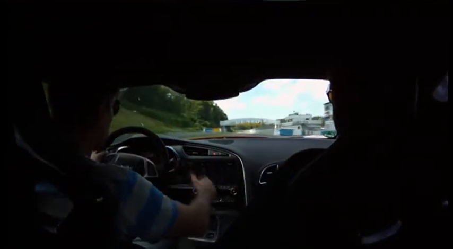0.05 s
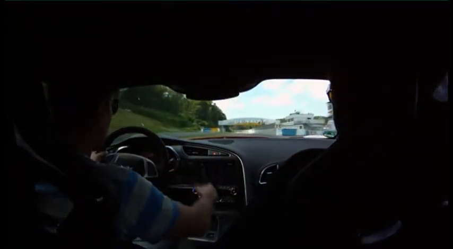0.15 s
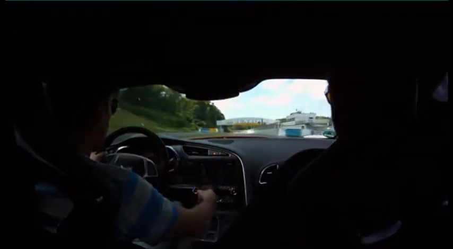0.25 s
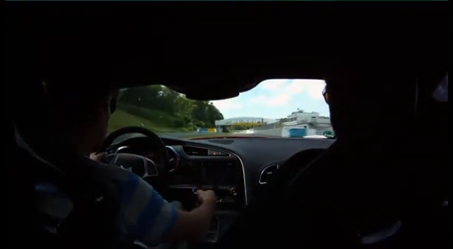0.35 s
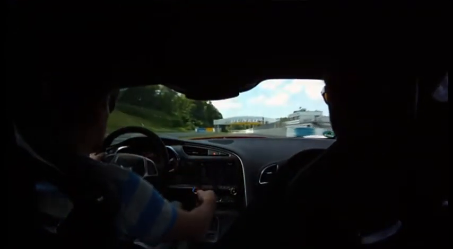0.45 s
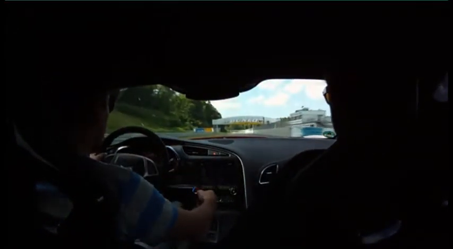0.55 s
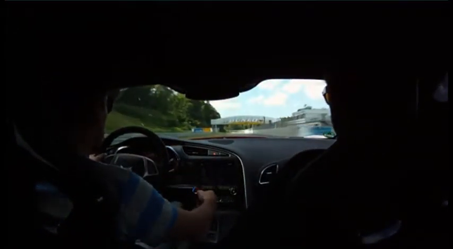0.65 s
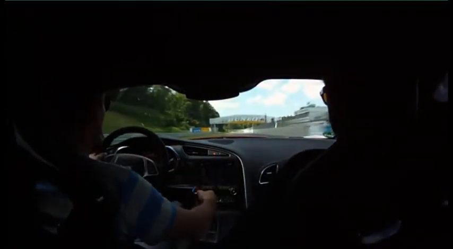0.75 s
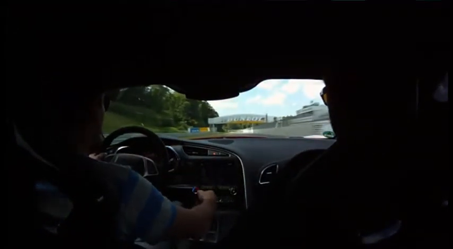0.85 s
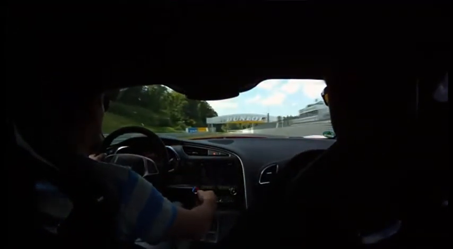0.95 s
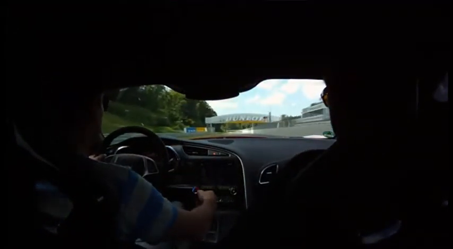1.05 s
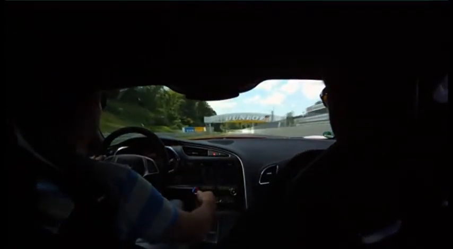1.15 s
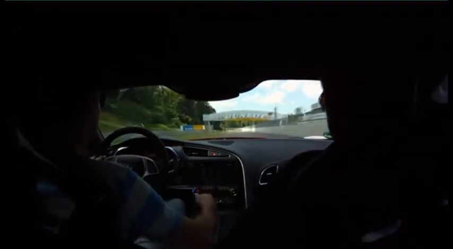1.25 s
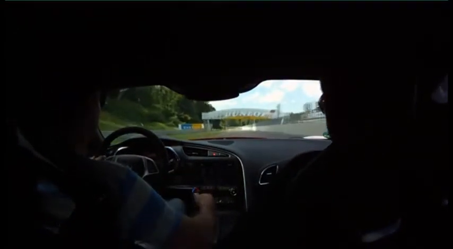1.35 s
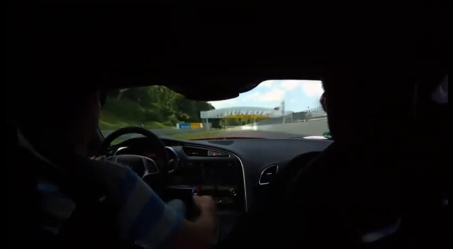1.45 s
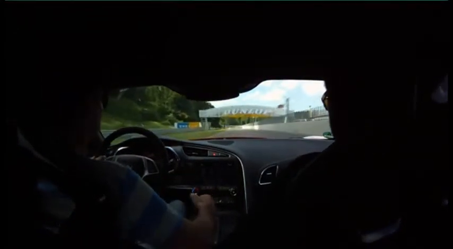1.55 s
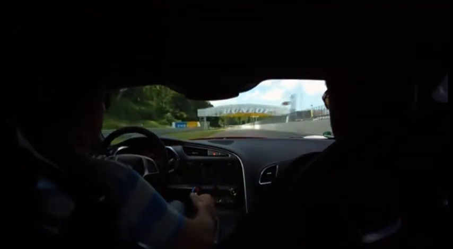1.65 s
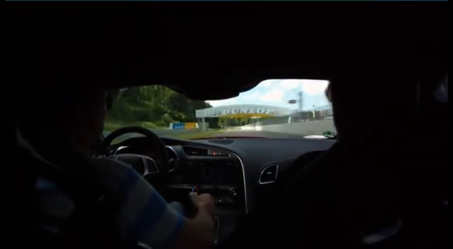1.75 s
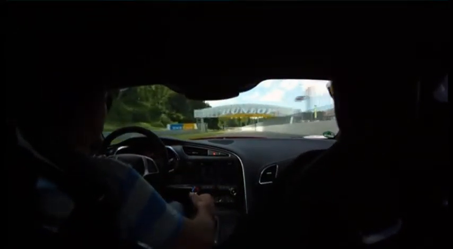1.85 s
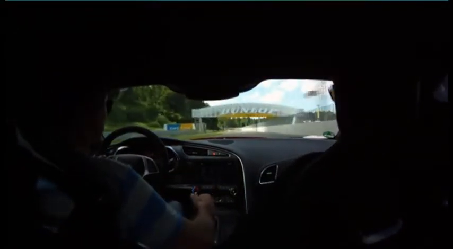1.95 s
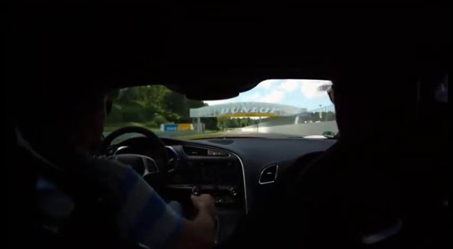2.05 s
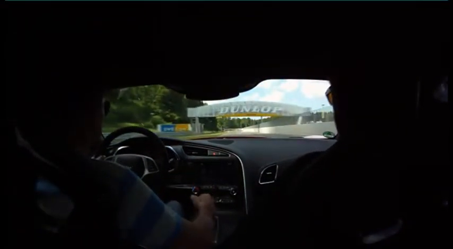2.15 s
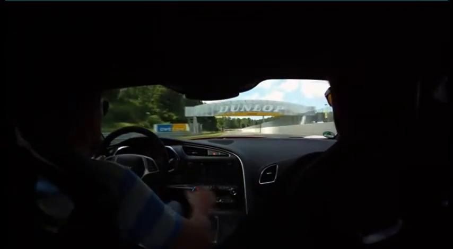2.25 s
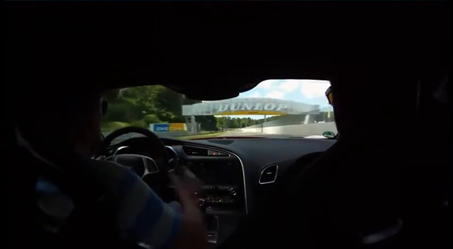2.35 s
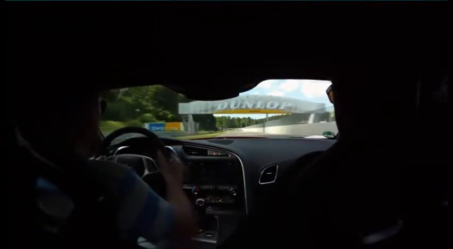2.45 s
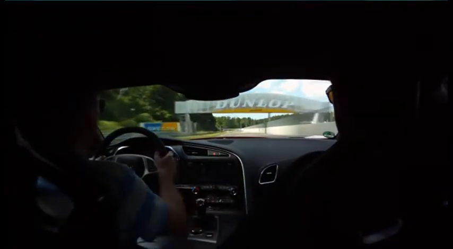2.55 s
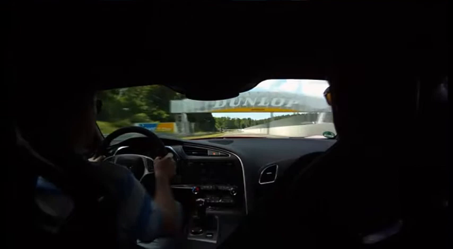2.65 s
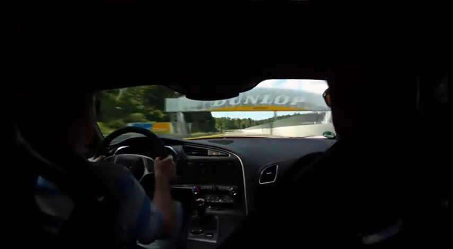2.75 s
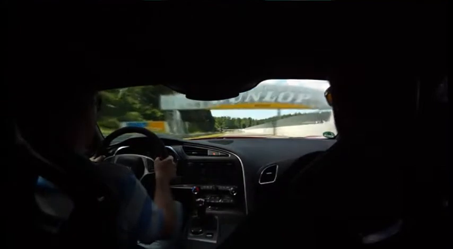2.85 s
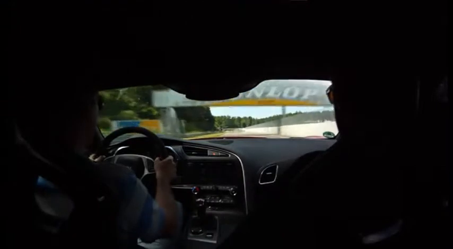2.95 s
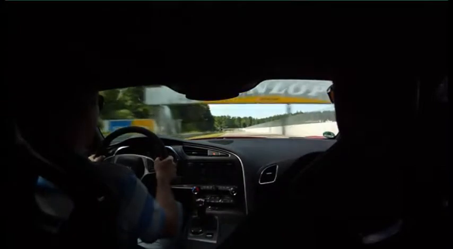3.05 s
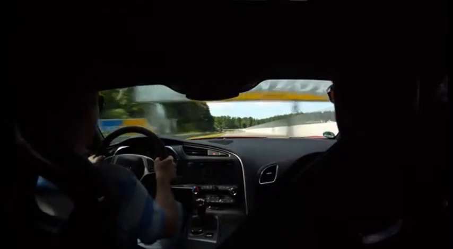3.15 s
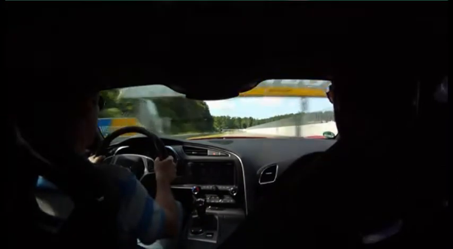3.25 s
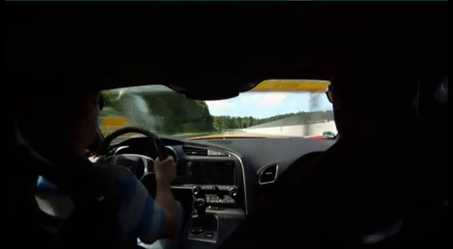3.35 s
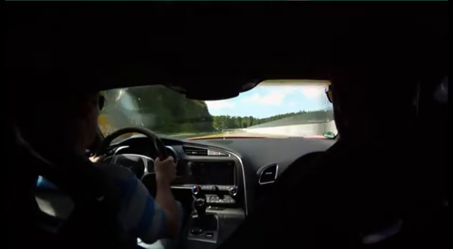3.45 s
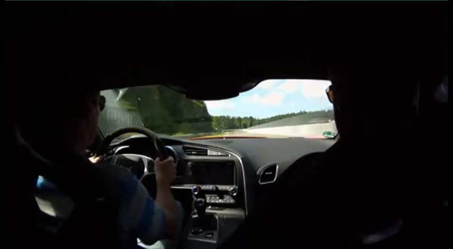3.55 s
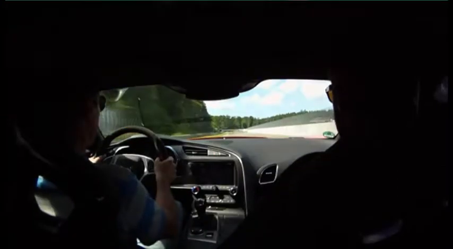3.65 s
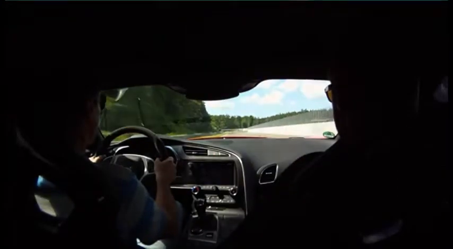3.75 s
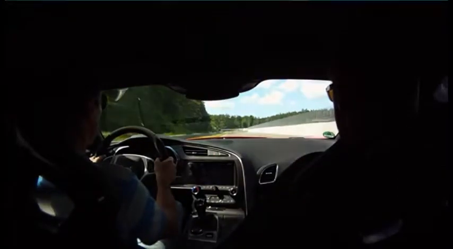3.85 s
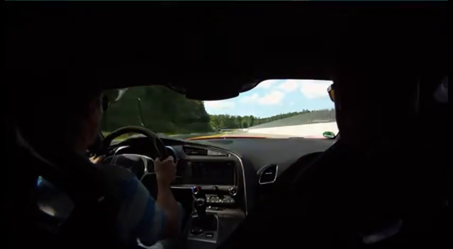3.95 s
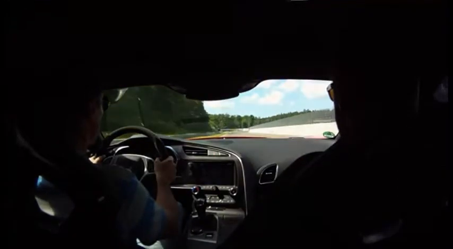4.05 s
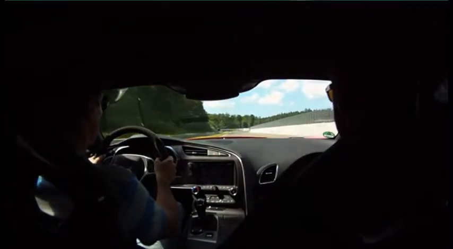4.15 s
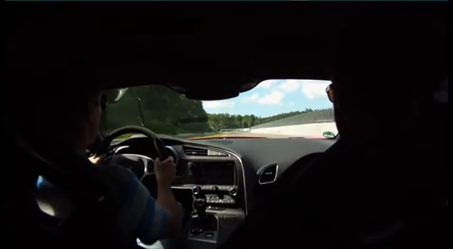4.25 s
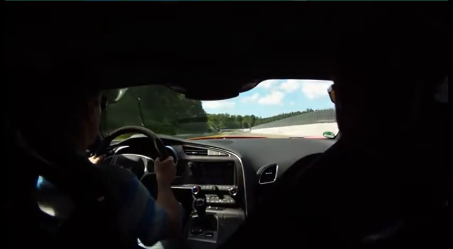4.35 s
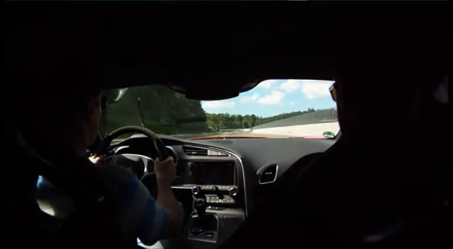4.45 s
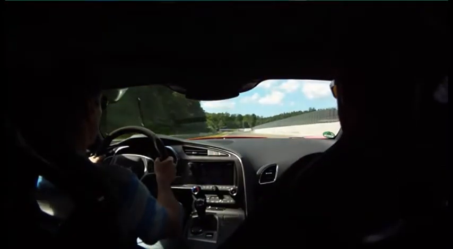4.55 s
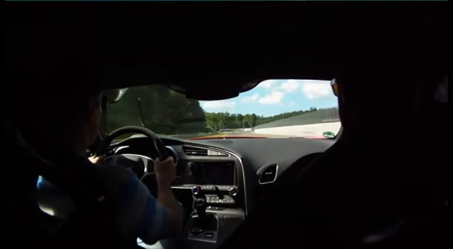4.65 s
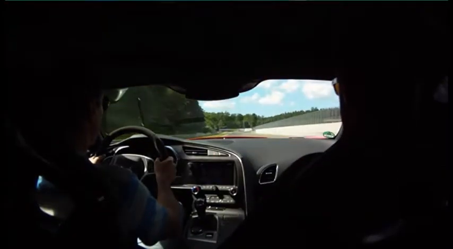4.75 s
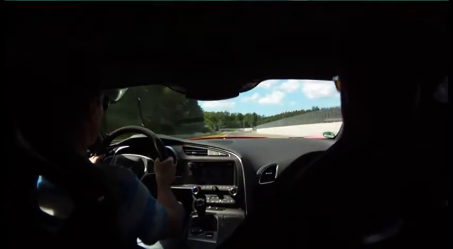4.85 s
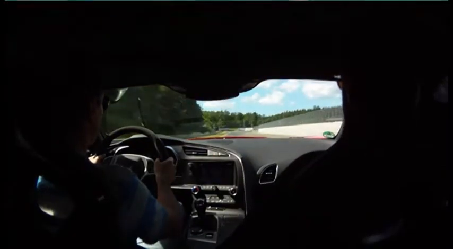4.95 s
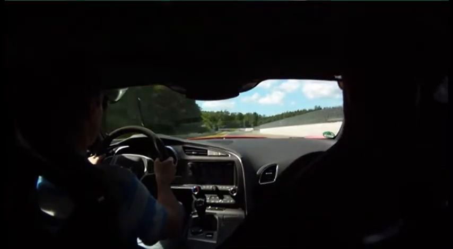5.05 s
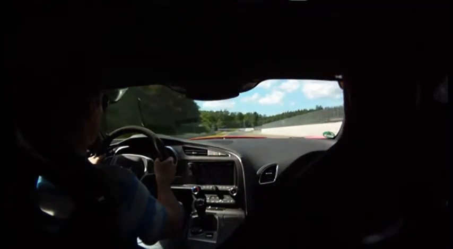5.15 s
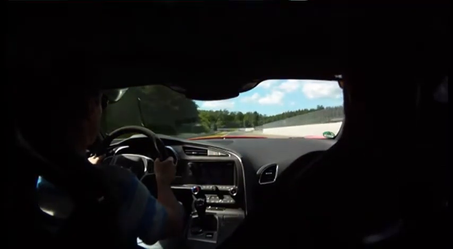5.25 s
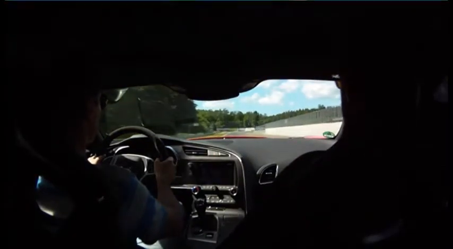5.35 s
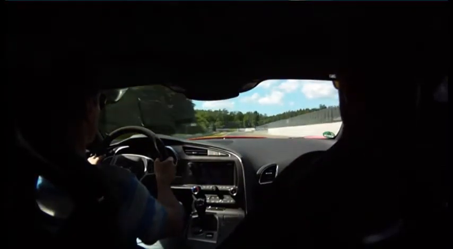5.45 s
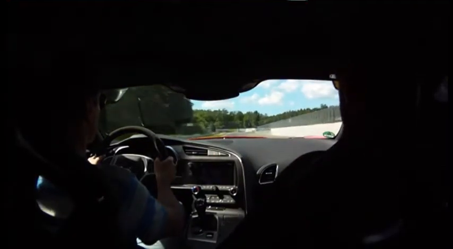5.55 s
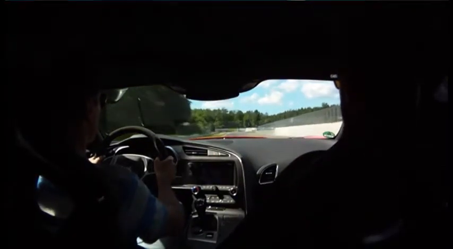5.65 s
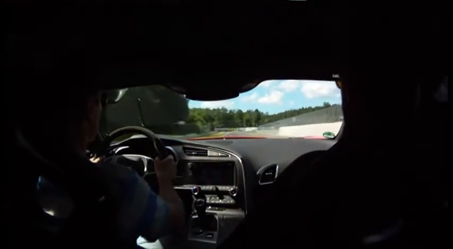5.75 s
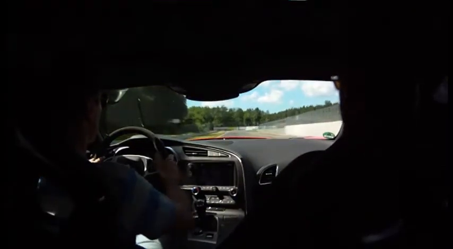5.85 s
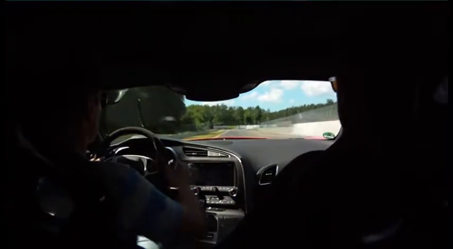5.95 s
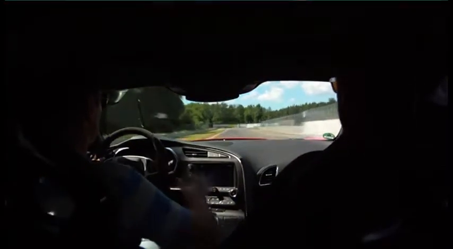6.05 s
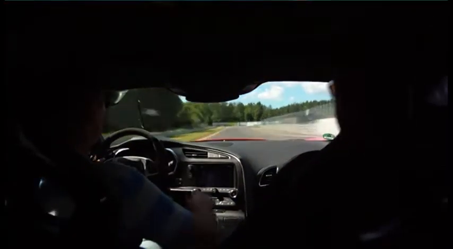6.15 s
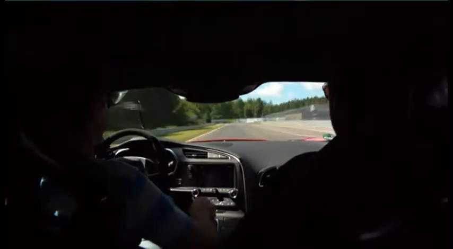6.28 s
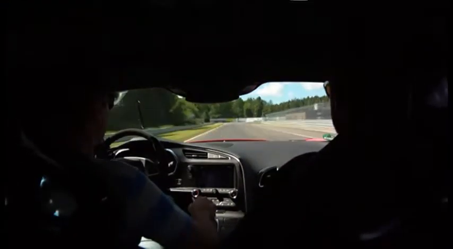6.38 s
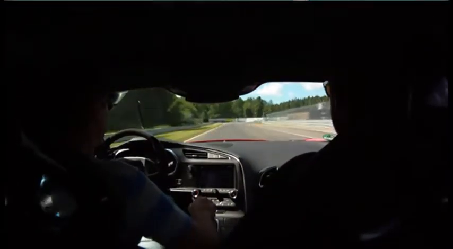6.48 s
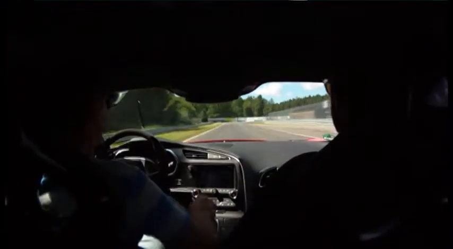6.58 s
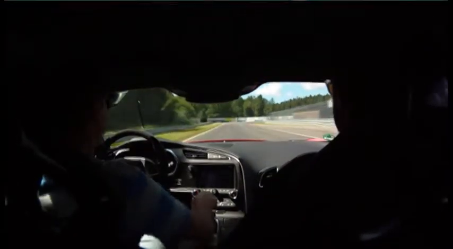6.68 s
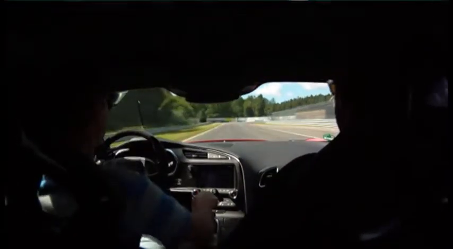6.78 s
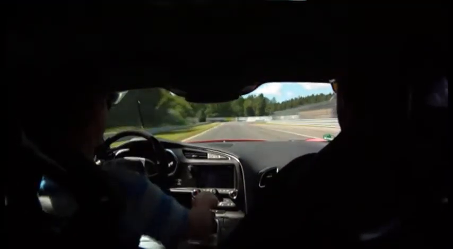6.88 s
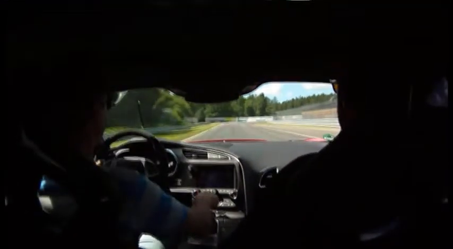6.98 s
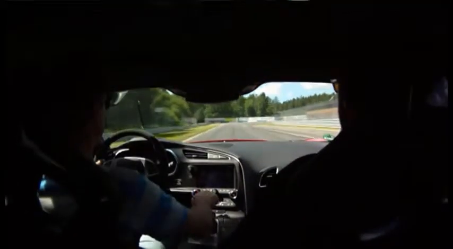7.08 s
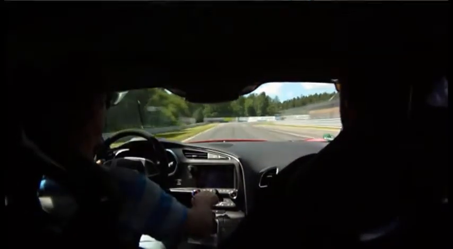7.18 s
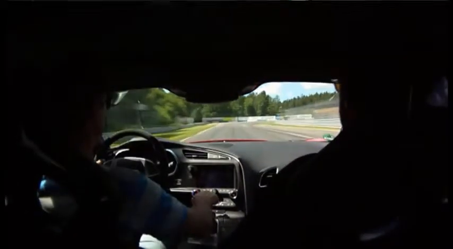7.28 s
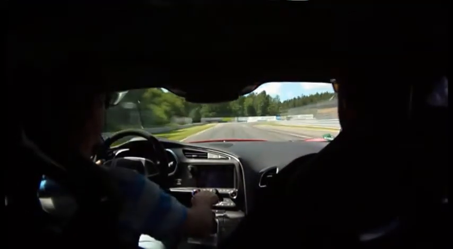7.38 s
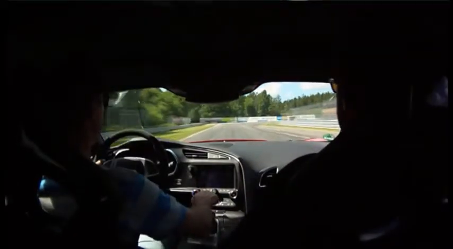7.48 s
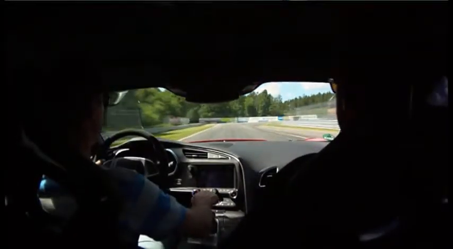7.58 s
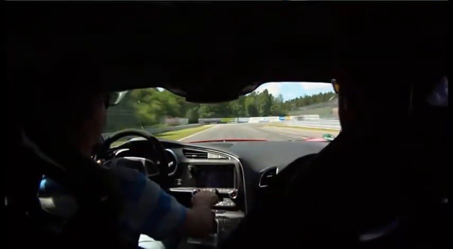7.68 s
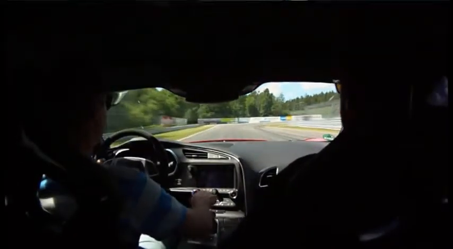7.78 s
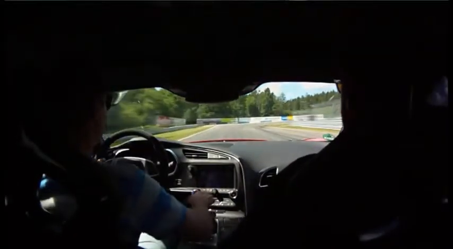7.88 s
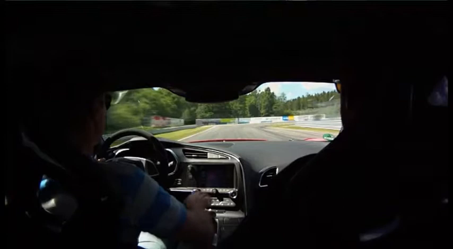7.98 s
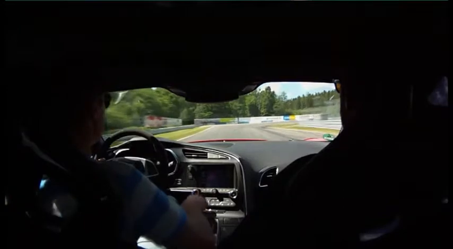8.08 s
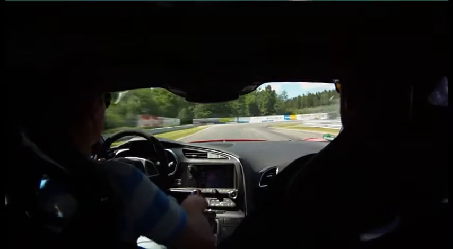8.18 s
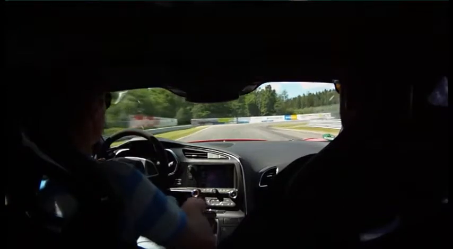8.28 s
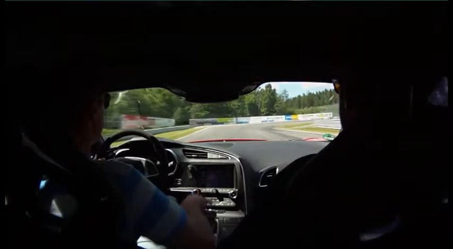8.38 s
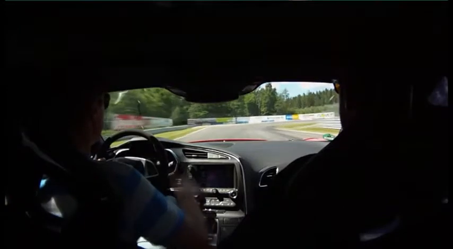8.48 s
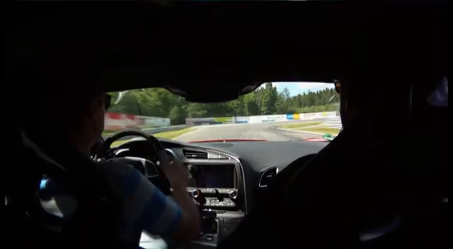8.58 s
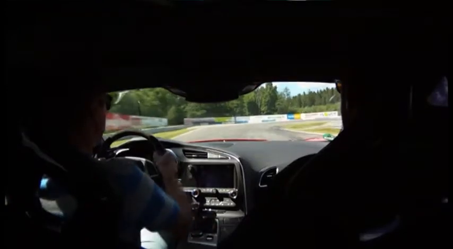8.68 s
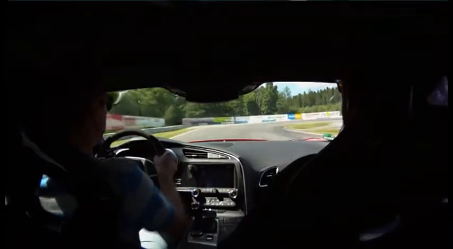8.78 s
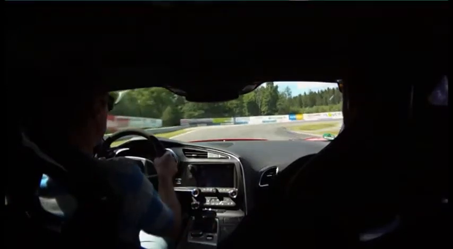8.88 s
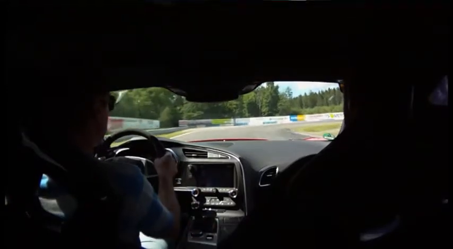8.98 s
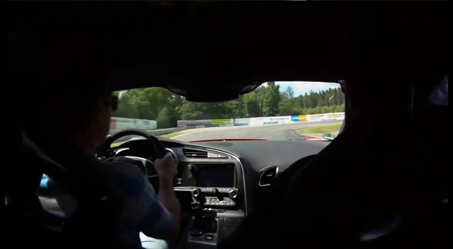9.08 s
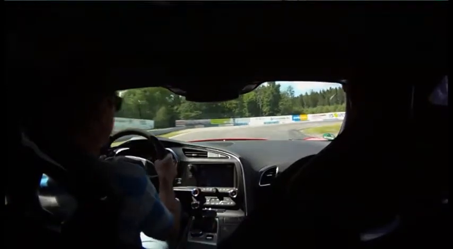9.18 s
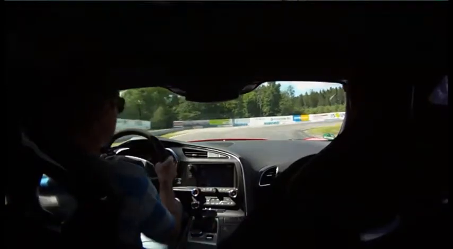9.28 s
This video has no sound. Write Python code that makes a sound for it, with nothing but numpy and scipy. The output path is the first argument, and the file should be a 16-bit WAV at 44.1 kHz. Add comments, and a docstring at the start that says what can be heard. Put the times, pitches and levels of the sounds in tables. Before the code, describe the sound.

Inside a sports car cabin, a V8 roars at full throttle, upshifts, pulls long, then brakes with two throttle blips, the microphone crackling from overload.

```python
"""A V8 at full throttle inside a sports car: an upshift, a long pull, then braking with two throttle blips.
Firing tone, octave and uneven half orders boom in the cabin; intake hiss comes in quick random puffs.
Thumps, ticks, a body drone and road rumble lie beneath. Body heave and engine shoves overload the
microphone capsules; the high-set, gently sloping wind filter behind them turns each clipped crest
into a crackle."""
import sys
import numpy as np
from scipy import signal
from scipy.fft import rfft, irfft, next_fast_len
from scipy.io import wavfile
from scipy.ndimage import uniform_filter1d

SR = 44100
rng = np.random.default_rng(int(sys.argv[2]) if len(sys.argv) > 2 else 0)


def transcribe(u):
    """Save the signal u as a 16-bit wav file named by the first command-line argument.

    u: samples, shape (n,) or (channels, n), limited to [-1, 1]; the rate is SR.
    q: integer samples, one column per channel.
    """
    v = np.clip(np.atleast_2d(u).T, -1, 1)
    q = np.round(v * 32767).astype(np.int16)
    wavfile.write(sys.argv[1], SR, q)


N = 410991

BOOM_HZ, WIND_CUT_HZ = 45.5, 2214
HARD_BEAT_S = 2.5058  # a moment when the hardest beat of the cycle falls


def undb(db):
    """Amplitude of a level in dB."""
    return 10 ** (np.asarray(db) / 20)


def unit(x):
    """Scales to an RMS of 1."""
    return x / np.sqrt(np.mean(x ** 2))


def lookup(table, at):
    """Columns joined by straight lines, read along a control; a first column that falls back is held."""
    x, *columns = np.transpose(table)
    return [np.interp(at, np.maximum.accumulate(x), c) for c in columns]


def curves(table):
    """Columns of a table in time."""
    return lookup(table, np.arange(N) / SR)


def band(x, hz, width_hz):
    """One resonance, gain 1 at its centre."""
    return signal.lfilter(*signal.iirpeak(hz, hz / width_hz, fs=SR), x)


def band_twice(x, hz, width_hz):
    """The same resonance twice in a row, with steeper skirts."""
    return band(band(x, hz, width_hz), hz, width_hz)


def high(x, hz, order):
    """High-pass."""
    return signal.sosfilt(signal.butter(order, hz, "high", fs=SR, output="sos"), x)


def walk(rate_hz):
    """Random levels held 1 / rate_hz and slewed twice; spread near 1."""
    k = int(SR / rate_hz)
    held = np.repeat(rng.standard_normal(N // k + 1), k)
    return 1.217 * uniform_filter1d(uniform_filter1d(held, k), k)[:N]


def add(out, s, sound):
    """Mixes a short sound in at time s."""
    i = int(s * SR)
    out[i:i + len(sound)] += sound[:N - i]


def ring(hz, t60_s):
    """One decaying mode."""
    t = np.arange(int(t60_s * SR)) / SR
    return np.sin(2 * np.pi * hz * t) * np.exp(-np.log(1000) * t / t60_s)


def engine(hz, load_db, half_db):
    """Clean firing tone and octave; the half orders waver and are coloured by the cabin air."""
    # exhaust and cabin favour some speeds and cancel others, at full load: firing_hz, tone_db, octave_db
    response = [(287, -40, -36), (296, -23, -32.5), (299.2, -20, -34.5), (303.9, -17.5, -34.5),
                (307.8, -18, -32), (315, -18.5, -47), (321, -19, -47), (315.6, -21.5, -35),
                (322.4, -16.5, -44.5), (330, -15, -41), (339.2, -13.5, -41.5), (346.3, -14.5, -36.5),
                (348.6, -13.5, -35.5), (363.3, -14.5, -30), (367.3, -15, -41), (385.9, -14, -39),
                (387.4, -18.5, -35), (390.8, -29.5, -28.5), (396.3, -15.5, -34), (402, -14.5, -33),
                (405.8, -16.5, -42), (411.5, -20.5, -48)]
    # unequal exhaust paths of the two banks: multiple of the two-turn cycle, level_db
    half_orders = [(2, -0.5), (3, -1.5), (4, 2.5), (5, 7.5), (6, 0.5), (7, 5), (9, -2), (10, 2.5), (11, -1),
                   (12, 3.5), (13, -1.5), (14, -3.5), (15, 2), (17, -9.5), (18, -6.5), (19, -5.5),
                   (21, -8.5), (22, -3.5)]
    # cabin air modes: pitch_hz, width_hz, level_db
    cabin_modes = [(97.6, 9.7, -1), (247.7, 48, -9.5), (352.4, 26.3, 6), (497, 63, -1.5), (1100, 350, -4)]
    beat_scatter_rad = 1.3

    firing_db, octave_db = lookup(response, hz)
    firing_db, octave_db = firing_db + load_db[0], octave_db + load_db[1]
    # eight firings in two crank turns
    cycle = 2 * np.pi * np.cumsum(hz * (1 + .002 * walk(40))) / SR / 8
    cycle -= cycle[int(HARD_BEAT_S * SR)]
    firing = undb(firing_db + .6 * walk(35)) * np.sin(8 * cycle)
    octave = undb(octave_db + 1.5 * walk(25)) * np.sin(16 * cycle)

    # the orders start at random phases loosely gathered around the hardest beat
    start_rad = beat_scatter_rad * rng.standard_normal(len(half_orders))
    half = np.zeros(N)
    for (k, db), phase_rad in zip(half_orders, start_rad):
        waver_db = 2.58 * walk(6.5) + 0.12 * k * walk(40)
        # off load the pulses soften and the upper orders fall away first
        soften_db = 0.034 * max(k - 10, 0) * (half_db + 32.5)
        half += undb(db + waver_db + soften_db) * np.sin(k * cycle + phase_rad)
    half = 0.53 * half + sum(undb(db) * band(half, f, w) for f, w, db in cabin_modes)
    return np.sqrt(2) * (firing + octave + undb(half_db) * half)


def throttle():
    """How far the intake is open (0-1), and how far tone and octave lie under full load (dB)."""
    # each spell of power: tone_stirs_s, part_level_db, intake_opens_s, tone_bites_s, intake_shuts_s,
    # shutting_takes_s, shut_level_db, tone_fades_s, tone_gone_s, overrun_level_db,
    # share of the drop that the octave follows
    power = [(-.3, -3, -.2, -.1, 1.23, .13, -6.5, 1.51, 1.56, -19, .3),
             (1.69, -16, 1.705, 1.785, 5.96, .09, -2.5, 6.09, 6.27, -21, .8),
             (7.1, -6, 7.225, 7.238, 7.46, .06, -1.5, 7.81, 7.99, -25, .8),
             (8.08, -9.5, 8.355, 8.352, 8.51, .09, -1, 8.74, 8.94, -16, .7)]
    stir_s, bite_s, open_s = .08, .015, .03
    drain_s, left_open = 0.053, 0.34  # the last share of intake noise drains away

    intake, load, overrun_db, share = [], [], 0, 0
    for stirs, part_db, opens, bites, shuts, takes, shut_db, fades, gone, next_db, follows in power:
        shut = shuts + takes
        intake += [(opens, 0), (opens + open_s, 1), (shuts, 1), (shut, left_open), (shut + drain_s, 0)]
        before = [(stirs, overrun_db), (stirs + stir_s, part_db), (bites, part_db)]
        after = [(bites + bite_s, 0), (shuts, 0), (min(shut, fades), shut_db),
                 (fades, shut_db), (gone, next_db)]
        load += [(s, db, share * db) for s, db in before]
        load += [(s, db, follows * db) for s, db in after]
        overrun_db, share = next_db, follows
    return curves(intake)[0], curves(load)


def heave(heave_db, pressure, hz, intake):
    """Body swings below hearing; engine shoves and single beats add to the nearest crest."""
    # the heaviest single beats push the cabin pressure over the top for a moment: time_s, strength_db
    bumps = [(.153, -2), (.172, -5), (.19, -1), (.212, -4), (.2774, -4), (.3657, 0.5), (.4425, -4),
             (.467, -3), (.4855, -6), (.508, 2), (.52, -9), (.548, -7), (.5665, -5), (.587, -6), (.607, -6),
             (1.299, -0.5), (1.319, 1), (1.344, -18), (1.73, -6), (1.763, 4), (1.939, -4), (2.005, 3),
             (2.029, -3), (2.08, -5), (2.124, -6), (2.158, -4.5), (2.189, -17), (2.275, 3.5), (2.326, -2),
             (2.352, 2.5), (2.378, -3), (2.398, -10), (2.453, -4), (2.479, -5), (2.506, -3), (2.531, -3),
             (2.5575, -10.5), (2.691, -3), (2.744, 2), (2.77, -4), (2.7965, 2), (2.845, -12), (2.888, -2),
             (2.953, 1.5), (2.9695, -5), (3.036, -5), (3.088, -3), (3.15, -6), (3.186, 2), (3.278, 0),
             (3.3735, -2), (3.399, -2), (3.431, -3), (3.483, -2), (3.507, -0.5), (3.558, 1), (3.583, -1),
             (3.684, 3), (3.733, -6), (3.908, -5), (3.934, -7), (4.059, 3), (4.192, -2), (4.46, -0.5),
             (4.576, -5), (4.604, -16), (4.678, 3), (4.702, -7), (4.798, -1), (4.87, 2), (5.078, -10),
             (5.17, -8), (5.491, -13), (5.972, -6), (5.994, -11), (6.024, -5), (6.029, 3), (6.036, -2),
             (6.05, -4), (6.082, -9.5), (6.145, -13), (6.153, 2), (7.191, 4), (7.25, -6), (7.47, -4.5),
             (7.494, -7.5), (7.516, -6.5), (7.529, -10), (7.533, -0.5), (7.541, -4), (7.562, -6),
             (7.568, -4.5), (7.604, 3), (7.629, -10.5), (7.639, -4), (7.668, -4.5), (7.676, -2),
             (7.686, -5), (7.694, -3), (7.704, -4.5), (7.732, -8.5), (7.761, -7), (7.828, -2), (8.375, -9),
             (8.558, -4.5), (8.565, -6), (8.58, -12), (8.587, -3), (8.6, -1.5), (8.638, -17), (8.648, -16),
             (8.657, -13), (8.662, -10), (8.683, -3), (8.693, -0.5), (8.709, -1), (8.716, -0.5),
             (8.725, 2.5), (8.73, -5), (8.752, -2.5), (8.76, -3), (8.769, 2.5), (8.809, -0.5)]
    heave_hz, heave_width_hz, bump_s = 14.15, 14.2, 0.0053
    shove_db, weak_turn_db, shove_spread_db = -14.5, -2.5, 2.5

    swing = unit(band_twice(rng.standard_normal(N), heave_hz, heave_width_hz))
    out = swing * undb(heave_db + 0.62 * walk(9))
    # under load the engine shoves the body once a crank turn, every second turn harder
    count = np.cumsum(hz) / SR / 4
    count = np.floor(count - count[int(HARD_BEAT_S * SR)])
    turns = np.flatnonzero(np.diff(count))[1:-1] + 1
    spread_db = shove_spread_db * rng.standard_normal(N // 200)[:len(turns)]
    shove = intake[turns] * undb(shove_db + weak_turn_db * (count[turns] % 2) + spread_db)

    s, db = np.transpose(bumps)
    shape, reach = np.hanning(int(bump_s * SR)), int(SR / 900)
    places = np.r_[turns, (s * SR).astype(int)]
    for i, size in zip(places, np.r_[shove, undb(db)]):
        near = slice(i - reach, i + reach)
        i += np.argmax(np.abs(pressure[near] + out[near])) - reach
        add(out, i / SR - bump_s / 2, np.sign(pressure[i]) * size * shape)
    return out


def hiss(hiss_db, intake):
    """Mechanical hiss in a few broad resonances of the firewall; it comes in puffs while the intake is open."""
    # firewall resonances: pitch_hz, width_hz, level_db, change_once_intake_shut_db
    firewall = [(1010, 1400, 2, -21.5), (1974, 620, 5, -30), (3130, 520, -2.5, -21.5),
                (4070, 5200, -18, -17.5), (6500, 5100, -20.5, -13)]
    gust_db, puff_db = 1, 1.5  # slow gusts, quick random puffs

    bands = [undb(db + 0.4 * walk(30)) * band_twice(rng.standard_normal(N), f, w) for f, w, db, _ in firewall]
    puffs_db = intake * (gust_db * walk(14) + puff_db * walk(110) - .6)
    noise = sum(b * undb(row[-1] * (1 - intake)) for b, row in zip(bands, firewall))
    return noise / np.std(sum(bands)) * undb(hiss_db + puffs_db)


def knocks():
    """Driveline thumps, and ticks: short scrapes that ring the mount lower as the blow is duller."""
    # driveline taking up or dropping the load: start_s, level_db, pitch_hz, t60_s
    thumps = [(1.229, -20, 90.5, 0.17), (1.724, -20, 86, 0.11), (1.795, -32, 199, 0.085),
              (7.189, -21.5, 209, 0.16)]
    # something small and hard knocks on the microphone mount: start_s, relative level_db, dullness (0-1)
    ticks = [(0.322, -49, 0), (0.3715, -49, 0), (0.421, -47, 0), (0.5686, -42.5, 0), (0.766, -42, 0.27),
             (1.4137, -44, 0.8), (1.726, -35.5, 0.8), (1.7787, -44, 0.34), (1.825, -47, 0),
             (1.919, -43.5, 0.25), (1.936, -48, 0.4), (1.9585, -47, 0.3), (1.9848, -45, 0.7),
             (2.0147, -46, 0.2), (2.056, -41, 0.2), (5.0893, -44, 0.09), (5.1305, -44, 0.1),
             (5.3294, -43, 0.32), (6.2347, -39.5, 0.95), (6.7989, -47, 0.7), (7.046, -35, 1),
             (7.118, -48, 0.78)]
    # mount modes: pitch_hz, width_hz, relative level_db, dullness it answers to (0-1)
    mount = [(10850, 1500, 3, 0), (8800, 1600, -12, 0), (6800, 660, -1.5, 0.37), (4300, 1900, -2, 0.48),
             (2800, 1500, -13, 0.87)]
    tick_decay_s = 0.0033

    out = np.zeros(N)
    for s, db, hz, t60_s in thumps:
        add(out, s, undb(db) * ring(hz, t60_s))
    t = np.arange(600) / SR
    scrapes = rng.standard_normal((len(ticks), len(t))) * np.exp(-t / tick_decay_s)
    for (s, db, dull), scrape in zip(ticks, scrapes):
        for hz, width_hz, mode_db, answers in mount:
            share = np.exp(-((dull - answers) / .5) ** 2)
            add(out, s, share * undb(db + mode_db + 13.5) * band(scrape, hz, width_hz))
    return out


def drone():
    """One low, wavering resonance of the body under braking: noise through a narrow band."""
    # time_s, level_db
    drone_level = [(5.7, -64), (5.85, -41), (6.2, -48), (8.1, -46.5), (8.6, -39), (9.32, -37.5)]
    drone_hz, width_hz = 71.7, 16
    return unit(band_twice(rng.standard_normal(N), drone_hz, width_hz)) * undb(curves(drone_level)[0])


def road(rumble_db):
    """Tyres and wind rumble through the body as shaped noise, flickering a little."""
    # colour of tyres and wind through the body: pitch_hz, relative density_db
    rumble_colour = [(15, -39.5), (25, -12), (65, -3), (100, -10), (140, -4.5), (290, -5), (410, -1),
                     (570, -12), (800, -21), (1100, -28), (1700, -34), (3200, -36.5), (4400, -44),
                     (5200, -58), (8800, -63), (11200, -55.5), (16000, -80.5)]
    hz, db = np.transpose(rumble_colour)
    size = next_fast_len(N)
    f = np.fft.rfftfreq(size, 1 / SR) + 1
    colour = undb(np.interp(np.log(f), np.log(hz), db))
    flicker = rng.standard_normal(N) * undb(0.99 * walk(12))
    noise = irfft(rfft(flicker, size) * colour)[:N]
    return unit(noise) * undb(rumble_db + 2.0)


def smear(x, length_s):
    """Spreads each click into a short burst of noise whose level and sign wander."""
    wander_rate_hz = 1000
    size = int(length_s * SR)
    tail = rng.standard_normal(size) * np.hanning(size)
    return walk(wander_rate_hz) * signal.fftconvolve(x, tail / np.linalg.norm(tail), "same")


def scene():
    """The closed cabin piles up pressure towards the bass."""
    # engine speed: time_s, firing_hz
    speed = [(0, 383.1), (1.17, 412.2), (1.31, 406), (1.385, 392.5), (1.5, 372.8), (1.7, 335.8),
             (1.795, 312.9), (1.87, 293), (1.92, 290), (1.98, 295), (3, 306.9), (4.4, 328.7), (5.75, 348.2),
             (6, 341), (6.15, 339.6), (6.6, 298), (6.7, 373.3), (7.1, 327.3), (7.19, 317.3), (7.238, 320.6),
             (7.255, 330.7), (7.35, 351.4), (7.45, 351), (7.72, 337.1), (7.9, 321.1), (8.16, 312.3),
             (8.345, 324.1), (8.38, 336.3), (8.48, 353.2), (8.7, 364.4), (8.95, 364.5), (9.32, 330)]
    # road: time_s, relative rumble_db, heave_db
    road_levels = [(0, -31, -13), (.3, -33, -10.5), (.8, -34, -22.5), (1.2, -29, -16.5), (1.4, -31, -21),
                   (1.68, -34.5, -20), (1.95, -35.5, -13.5), (2.4, -35.5, -18), (3.1, -32, -16),
                   (3.8, -32.5, -16), (4.2, -33.5, -25), (5.2, -34, -16), (6, -30, -21), (6.2, -30, -28),
                   (7, -34, -30), (7.25, -28.5, -23), (7.5, -34.5, -23), (8.2, -37, -29),
                   (8.53, -33.5, -31), (9.32, -39, -29)]
    # with the intake open: firing_hz, uneven half_orders_db, valve-gear and intake hiss_db
    load_levels = [(289, -37, -46), (302, -39.5, -43), (328.6, -39, -41), (341.6, -45.5, -39.5),
                   (352, -42.5, -42.5), (388, -39, -37), (383, -38, -39.5), (399.7, -36, -37.5)]
    shut_half_db = -11.5  # change of the half orders once the intake is shut

    hz = curves(speed)[0]
    rumble_db, heave_db = curves(road_levels)
    intake, load_db = throttle()
    half_db, hiss_db = lookup(load_levels, hz)
    heard = engine(hz, load_db, half_db + shut_half_db * (1 - intake))
    heard = heard + hiss(hiss_db, intake) + knocks() + drone() + road(rumble_db)
    boom, cut = np.exp(-2 * np.pi * np.array([BOOM_HZ, WIND_CUT_HZ]) / SR)
    pressure = signal.lfilter([1, -cut], [1, -boom], heard)
    return np.tile(pressure + heave(heave_db, pressure, hz, intake), (2, 1))


def record(dry):
    """Capsules clip; the wind filter keeps the slope, so flat crests become gaps and crackle."""
    overload_db, low_cut_hz, top_hz = 4.5, 28, 11750
    crackle_hz, wander_hz, wander_db = 2700, 4900, -11.5
    sharp_side_hz, sharp_side_db = 4500, 5.5
    smear_s, fizz_s, fizz_share = 0.024, .007, .33

    top = undb(overload_db)
    boom, cut = np.exp(-2 * np.pi * np.array([BOOM_HZ, WIND_CUT_HZ]) / SR)
    clipped = np.clip(dry, -top, top)
    lost = clipped[0] - dry[0]
    x, crackle = (signal.lfilter([1, -boom], [1, -cut], v) for v in (clipped, lost))
    x = high(x, low_cut_hz, order=3)

    # the crackle and the top of the hiss wander between left and right
    loose = high(crackle, crackle_hz, order=2) + high(x[0] - crackle, wander_hz, order=6)
    side = high(smear(loose, smear_s), 700., order=3)
    side += undb(sharp_side_db) * walk(120) * high(crackle, sharp_side_hz, order=4)

    # part of each sharp edge is spread into a short fizz around it
    edge = crackle - uniform_filter1d(crackle, size=28)
    x = x + fizz_share * (high(smear(edge, fizz_s), 900., order=2) - edge)
    x = x + undb(wander_db) * side * np.array([[1], [-1]])
    return signal.sosfilt(signal.ellip(8, .2, 60, top_hz, fs=SR, output="sos"), x)


dry = scene()
out = record(dry)
transcribe(out)
```